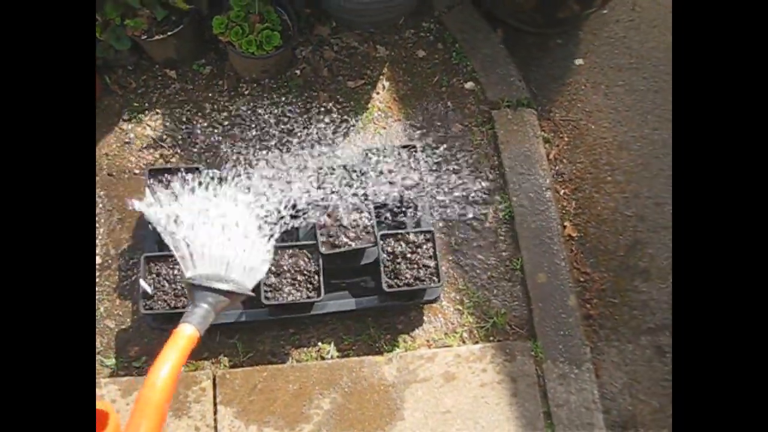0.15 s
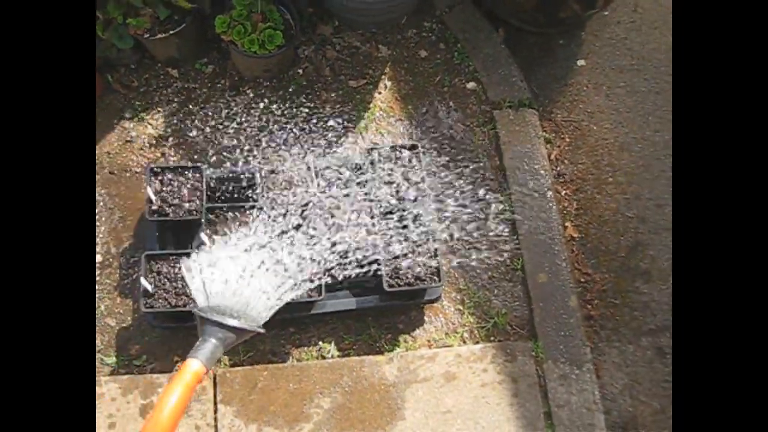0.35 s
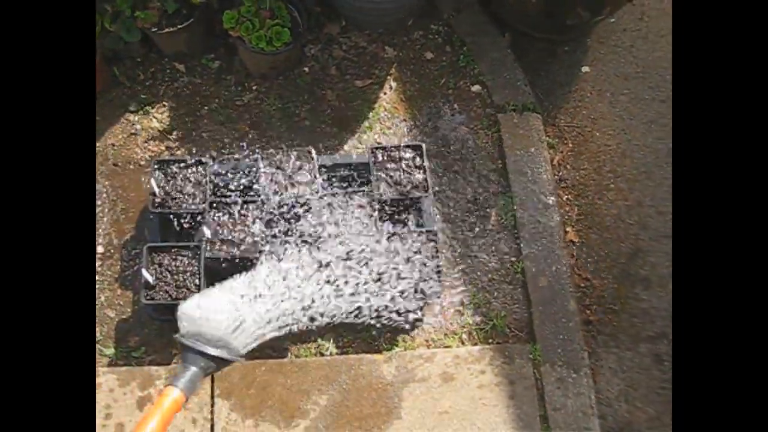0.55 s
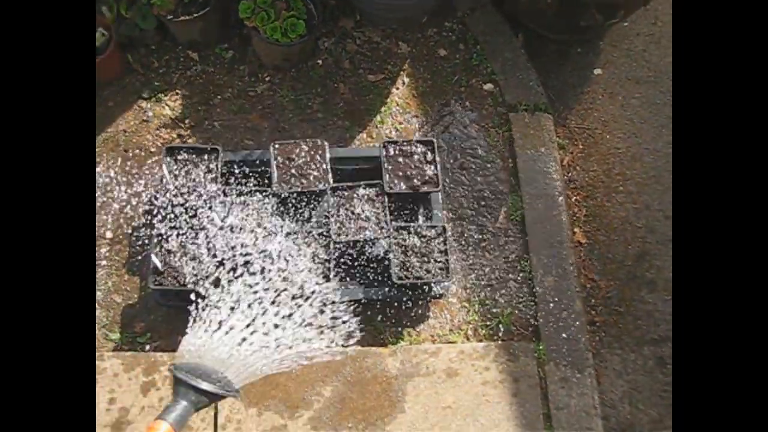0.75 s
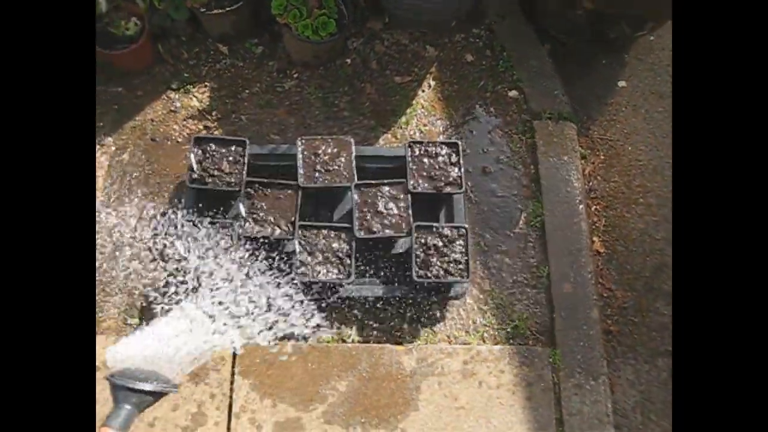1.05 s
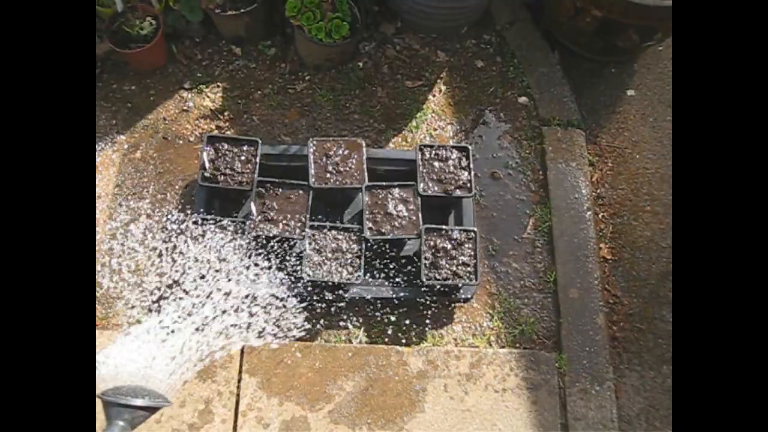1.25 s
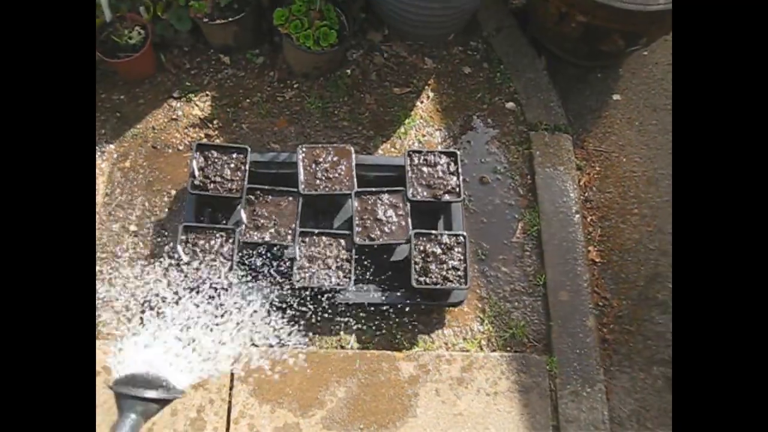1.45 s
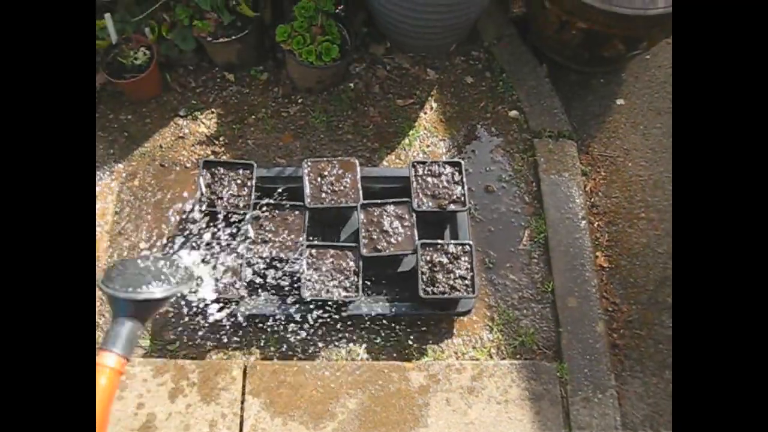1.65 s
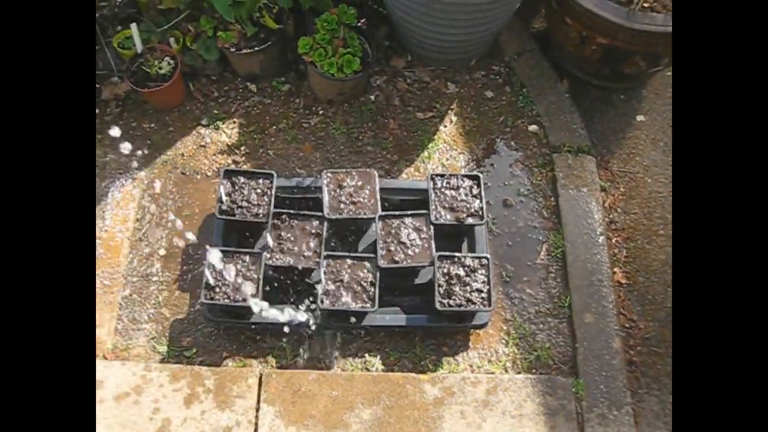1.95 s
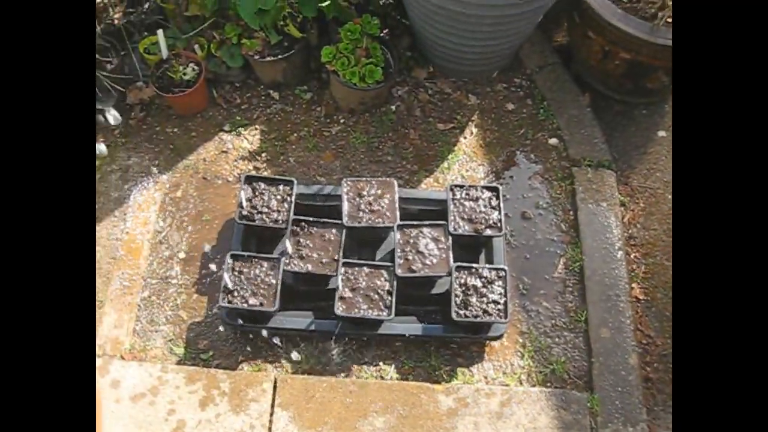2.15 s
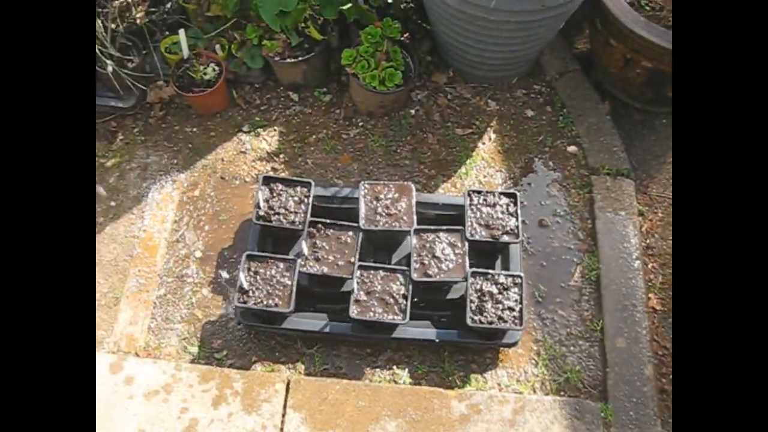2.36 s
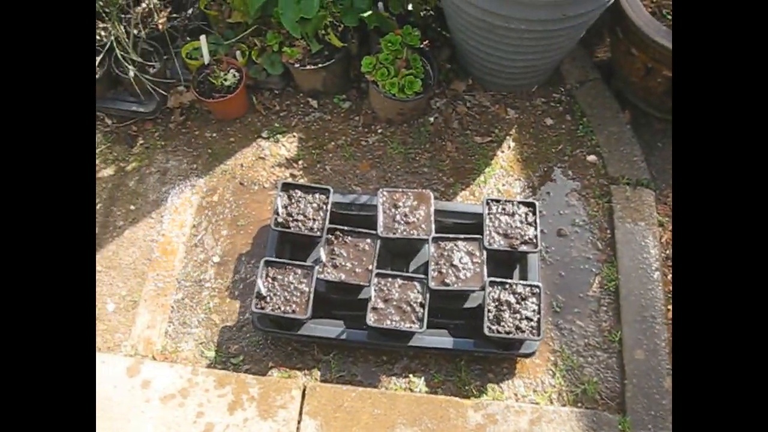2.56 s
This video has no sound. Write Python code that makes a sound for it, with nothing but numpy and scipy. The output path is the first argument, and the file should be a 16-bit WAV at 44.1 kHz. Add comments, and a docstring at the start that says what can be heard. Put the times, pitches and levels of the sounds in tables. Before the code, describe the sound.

Water from a watering can showers onto soil in plastic pots, then stops and drips.

```python
"""Watering plastic pots

A shower from a sprinkler rose falls on compost in plastic pots, then on the ground beside them, close by
outdoors. Dense random impacts merge into a noise that drums, splashes and fizzes; fat drops tick sharply.
The spray stops near 1.9 s: last drops slap down, the plastic waterer gives a hollow thump and a few
knocks as its modes are struck, and the wet ground trickles."""
import sys
import numpy as np
from scipy import signal
from scipy.fft import rfft, irfft
from scipy.io import wavfile
from scipy.ndimage import uniform_filter1d

SR = 44100
rng = np.random.default_rng(int(sys.argv[2]) if len(sys.argv) > 2 else 0)


def materialize(psi):
    """Save the field psi as 16-bit PCM at rate SR to the path in sys.argv[1].

    A 1-D psi becomes a single channel; in a 2-D psi each row is a channel.
    """
    bounded = np.clip(np.atleast_2d(psi).T, -1, 1)
    quanta = np.round(bounded * 32767).astype(np.int16)
    wavfile.write(sys.argv[1], SR, quanta)


N = 119070
TIME_S = np.arange(N) / SR
FREQ_HZ = np.maximum(np.arange(N // 2 + 1) * SR / N, 1)
DROP_LOW_HZ, TOP_HZ = 394, 15600  # lower edge of the drop sounds; upper limit of the sound


def amp(db):
    """Decibels to amplitude ratio."""
    return 10 ** (np.asarray(db, float) / 20)


def unit(x):
    """Normalisation to rms 1."""
    return x / np.sqrt(np.mean(x ** 2) + 1e-20)


def spectrum(points):
    """Spectral envelope: gain interpolated through (Hz, dB) points on a log frequency axis."""
    hz, db = np.array(sorted(map(tuple, points)), float).T
    return amp(np.interp(np.log(FREQ_HZ), np.log(hz), db))


def peak(detuning):
    """Lorentzian resonance curve, one half at a detuning of 1."""
    return 1 / (1 + detuning ** 2)


def colour(x, gain):
    """Minimum-phase filtering: folding the cepstrum makes the response causal."""
    cepstrum = irfft(np.log(gain + gain.max() * 1e-5), N)
    cepstrum[1:N // 2] *= 2
    cepstrum[N // 2 + 1:] = 0
    response = irfft(np.exp(rfft(cepstrum)), N)[:4096]
    return signal.fftconvolve(x, response)[:N]


def noise(gain):
    """Spectrally shaped Gaussian noise of rms 1."""
    return unit(irfft(rfft(rng.standard_normal(N)) * gain, N))


def fade(start, decay):
    """Exponential decay from a sudden onset."""
    age = TIME_S - start
    return (age >= 0) * np.exp(-np.maximum(age, 0) / max(decay, 1e-4))


def burst(start, decay, gain):
    """Impact transient: coloured noise dying away from about rms 1."""
    envelope = fade(start, decay)
    x = noise(gain) * envelope
    return x * np.sqrt(np.sum(envelope ** 2) / (np.sum(x ** 2) + 1e-20))


def damped_mode(start, hz, db, decay, rise_s):
    """Free vibration of one mode: a damped sine with a soft onset."""
    envelope = fade(start, decay) * (1 - fade(start, rise_s))
    return amp(db) * envelope * np.sin(2 * np.pi * hz * (TIME_S - start))


def wander(rate_hz):
    """Smoothed random fluctuation with a spread near 1."""
    hold = int(SR / rate_hz)
    steps = np.repeat(rng.standard_normal(N // hold + 1), hold)
    return 1.3 * uniform_filter1d(uniform_filter1d(steps, hold), hold)[:N]


def patter(rate, spread_db, decay):
    """Shot noise: randomly timed splashes, many small and few large, add in power."""
    size = amp(spread_db * np.minimum(rng.exponential(size=N), 6))
    impacts = size * (rng.random(N) < rate / SR)
    power = signal.lfilter([1], [1, -np.exp(-2 / (decay * SR))], impacts ** 2)
    return unit(np.sqrt(power) * rng.standard_normal(N))


def pitched_patter(edges_hz, rate, spread_db, decay, pitches=3, width_octaves=0.51):
    """Incoherent sum: independent drop streams, pitched between the edges, add to a flat spectrum."""
    centres = np.geomspace(*edges_hz, 2 * pitches + 1)[1::2]
    bands = peak(np.log2(FREQ_HZ / centres[:, None]) / width_octaves) ** 2
    bands = bands / np.sqrt(np.sum(bands ** 2, axis=0))
    return sum(colour(patter(rate, spread_db, decay), band) for band in bands)


# Spectrum of still garden air: frequency_hz, relative_db
AIR_SPECTRUM = [(20, -4), (52, 4), (100, -3.5), (320, 5), (1000, -6.5), (15000, -39)]
def garden_air():
    """Ambient noise: a faint, stationary floor, strongest in the bass."""
    return amp(-55.5) * noise(spectrum(AIR_SPECTRUM))


def yard_reflections(direct):
    """Diffuse reflection: convolution with a weak, quickly decaying noise tail."""
    response = rng.standard_normal(N) * fade(start=0.0019, decay=0.036)
    response /= np.sqrt(np.sum(response ** 2))
    return amp(-18) * signal.fftconvolve(direct, response)[:N]


# Bubbles in the trickle: start_s, pitch_hz, level_db, decay_s, width_hz
BUBBLES = [(2.023, 5900, -25.5, 0.01, 400), (2.27, 5100, -40, .07, 350), (2.514, 4200, -37.5, 0.043, 130)]
def bubbles():
    """Bubble resonance: narrow bands of decaying noise give thin, wavering rings."""
    return sum(amp(db) * burst(start, decay, peak(2 * (FREQ_HZ - hz) / width))
               for start, hz, db, decay, width in BUBBLES)


# Rings of struck plastic and puddles: start_s, pitch_hz, level_db, decay_s
PLINK_MODES = [(2.008, 990, -17, 0.0051), (2.01, 1440, -19.5, 0.0068), (2.0727, 2920, -8.5, 0.0031),
               (2.3497, 2614, -17, 0.0082), (2.358, 1150, -33, 0.02), (2.495, 2100, -29, 0.0092),
               (2.496, 331, -37.5, 0.018), (2.661, 2693, -24, 0.0055), (2.672, 2250, -26.5, 0.0075),
               (2.685, 992, -33.5, 0.018)]
def plinks():
    """Impulse excitation: some impacts leave a single mode ringing briefly."""
    return sum(damped_mode(*mode, rise_s=0.00035) for mode in PLINK_MODES)


# Brief bursts through the waterer's shell, the later ones knocks: start_s, level_db, decay_s,
# tilt_db_per_octave
SHELL_KNOCKS = [(2.327, -29.5, 0.012, 4), (2.3498, -26, 0.033, 1), (2.4922, -24.5, 0.011, 4.5),
                (2.659, -34.5, 0.036, 5)]
# Response of its plastic shell: frequency_hz, relative_db
SHELL_SPECTRUM = [(120, -33), (330, 1), (480, -12), (700, 1), (1150, 0.5), (1450, -2), (2050, 2.5),
                  (2900, -5.5), (3700, -12.5), (5300, -10), (8000, -17.5), (12000, -16.5), (15000, -34)]
def waterer_knocks():
    """Source and filter: the shell's broad resonances colour each knock and rattle."""
    shell = spectrum(SHELL_SPECTRUM)
    return sum(amp(db) * burst(start, decay, shell * amp(tilt * np.log2(FREQ_HZ)))
               for start, db, decay, tilt in SHELL_KNOCKS)


# Thumps of the emptying waterer: start_s, gain_db
BODY_THUMPS = [(2.04, -11.5), (2.121, 1)]
# Modes of its hollow body: pitch_hz, relative_db, decay_s
BODY_MODES = [(150.5, -34, 0.077), (172, -37, 0.053), (190, -39, 0.042), (263, -41, 0.026)]
def waterer_thumps():
    """Modal superposition: the low modes of the hollow body sound together, softly, then fully."""
    return sum(damped_mode(start, hz, gain_db + db, decay, rise_s=0.0048)
               for start, gain_db in BODY_THUMPS for hz, db, decay in BODY_MODES)


# Last drops, with relative band levels: start_s, decay_ms, thud_db, clack_db, snap_db, fizz_db
LAST_DROPS = [(1.8644, 3.4, -35, -53, -28, -19.5), (1.9055, 0.66, -20, -37, -16, -25),
              (1.9286, 5.8, -30.5, -26, -26.5, -27), (1.9776, 7.5, -29, -22, -22, -21),
              (2.0076, 2.7, -15, -21, -10.5, -12), (2.0174, 2, -29, -22, -14, -12.5),
              (2.0513, 3.3, -19.5, -25, -18, -14), (2.0729, 3.6, -23.5, -14.5, -13.5, -33),
              (2.0824, 1, -32, -38, -46, -11.5), (2.103, 3.9, -36, -26, -32, -16.5),
              (2.1165, 1.3, -37, -28, -7.5, -16), (2.1272, 3.9, -57, -36, -24, -15),
              (2.142, 0.84, -55, -33, -22, -9.5), (2.158, 3.8, -51, -26.5, -36, -23),
              (2.1817, 0.77, -59, -28, -19, -7.5), (2.198, 1.7, -41, -20, -20, -17),
              (2.2196, 1.4, -77, -14, -11, -10.5), (2.2613, 2.6, -46, -37, -33, -21.5),
              (2.4496, 4.7, -51, -24.5, -23, -15), (2.5769, 0.89, -46, -34, -37, -20),
              (2.5922, 0.89, -51, -51, -37, -21), (2.6855, 1.7, -35.5, -44, -11.5, -29)]
# Centres of those bands: thud_hz, clack_hz, snap_hz, fizz_hz
SLAP_BANDS_HZ = [1000, 2900, 5600, 10000]
def last_drops():
    """Impact and secondary splash: each drop slaps wet plastic or ground and scatters droplets."""
    scatter_db, scatter_s = -14, 0.006
    slaps = 0
    for start, decay_ms, *band_db in LAST_DROPS:
        density_db = np.array(band_db) - 10 * np.log10(SLAP_BANDS_HZ)  # band level to level per hertz
        skirts = [(400, density_db[0] - 10), (650, density_db[0] - 5), (15500, density_db[-1] - 10)]
        gain = spectrum([*skirts, *zip(SLAP_BANDS_HZ, density_db)])
        strength = amp(-2.5) * np.sqrt(np.sum(amp(band_db) ** 2))
        impact = burst(start, decay_ms / 1000, gain)
        scatter = amp(scatter_db) * burst(start, scatter_s, gain)
        slaps += strength * (impact + scatter)
    return signal.sosfilt(signal.butter(4, DROP_LOW_HZ, "high", fs=SR, output="sos"), slaps)


# Fat drops in the shower: start_s, relative_db, centre_hz, decay_ms
FAT_DROPS = [(0.1868, -13, 9800, 0.84), (0.2333, -15, 10000, 1.2), (0.2883, -15, 8400, 1.6),
             (0.3048, -8.5, 8200, 0.97), (0.3967, -12.5, 8900, 2.1), (0.4112, -6, 10800, 0.35),
             (0.416, -19, 5200, 3.3), (0.447, -11, 9700, 1.2), (0.5246, -10, 9600, 0.55),
             (0.6093, -13.5, 10200, 1.1), (0.66, -7, 10100, 0.49), (0.674, -15, 9200, 5.5),
             (0.756, -16, 7100, 1.9), (0.812, -14.5, 7860, 1), (0.8328, -13, 10100, 0.76),
             (0.8395, -7, 8400, 1.7), (0.8571, -12, 10000, 0.57), (0.9784, -16.5, 9400, 1.2),
             (1.0957, -11.5, 10100, 1.6), (1.174, -16.5, 7400, 0.98), (1.2126, -13, 10300, 0.62),
             (1.3029, -10, 9400, 0.52), (1.4806, -17, 5700, 3.7), (1.5091, -13.5, 8500, 1.1),
             (1.6479, -11, 9700, 0.5), (1.6721, -11, 9450, 1.3), (1.8085, -12.5, 8300, 0.59)]
def fat_drops(gain_db=-2, width_octaves=0.24):
    """Brief impacts radiate high frequencies: each fat drop gives a bright tick."""
    return sum(amp(db + gain_db) * burst(start, ms / 1000, peak(np.log2(FREQ_HZ / hz) / width_octaves))
               for start, db, hz, ms in FAT_DROPS)


# Pot and tray walls under the spray: middle_s, half_length_s, pitch_hz, width_hz, level_db
WALL_RESONANCES = [(0.169, 0.038, 1300, 120, -30), (.3, 0.25, 2610, 200, -42.5),
                   (0.494, 0.03, 1300, 130, -31.5), (0.816, 0.14, 680, 282, -32.5),
                   (1.085, .08, 2770, 344, -37.5), (1.135, 0.013, 800, 150, -29),
                   (1.602, 0.017, 2770, 300, -37)]
def pot_walls():
    """Forced vibration: drops drive one resonance of the plastic after another as the spray passes."""
    rate, spread_db, decay, _ = DROP_GRAIN[1]  # the shower's splash band
    bass_cut = 1 / (1 + (DROP_LOW_HZ / FREQ_HZ) ** 6)
    ringing = 0
    for middle, half_length, hz, width, db in WALL_RESONANCES:
        resonance = peak(2 * (FREQ_HZ - hz) / width) ** .75 * bass_cut
        dwell = np.exp(-((TIME_S - middle) / half_length) ** 2 / 2)
        ringing += amp(db) * dwell * unit(colour(patter(rate, spread_db, decay), resonance))
    return ringing


# Spectra of water on the pots, on the ground and trickling afterwards: frequency_hz, relative_db
POT_SPECTRUM = [(100, -40), (205, -28), (340, -13.5), (467, -18), (560, -7), (936, -4.5), (1060, -10),
                (1200, -4.5), (1320, -3.5), (1480, -10), (2250, -14), (2650, -12.5), (3200, -15),
                (4800, -16.5), (7000, -17), (8770, -13), (12000, -11.5), (15500, -23.5)]
GROUND_SPECTRUM = [(59, -44), (177, -38.5), (270, -9), (467, -13), (589, -4.5), (808, -0.5), (1130, -7),
                   (1310, -3), (1920, -8), (2420, -8.5), (2690, -3.5), (3250, -9), (5870, -10.5),
                   (6810, -15.5), (8770, -11.5), (11500, -13), (15500, -23.5)]
TRICKLE_SPECTRUM = [(100, -6), (220, -3), (330, 2), (480, -8.5), (750, 0), (1500, -1), (2700, 1),
                    (3600, -4.5), (5400, 1.5), (7000, -13), (10500, -12), (13000, -22), (15500, -26)]
def strike_surfaces(drops, band):
    """The struck surface sets the timbre: pots, ground, paving and trickle crossfade in turn."""
    leaves_pots_s, reaches_paving_s, trickles_s, crossfade_s = 0.587, 1.278, 2.104, 0.2
    off_pots, paved, stopped = (np.clip((TIME_S - middle) / crossfade_s + .5, 0, 1)
                                for middle in (leaves_pots_s, reaches_paving_s, trickles_s))
    paving = [(hz, db - 2 / (1 + (hz / 770) ** 4)) for hz, db in GROUND_SPECTRUM]  # thinner in the bass
    surfaces = [(1 - off_pots, POT_SPECTRUM), (off_pots * (1 - paved), GROUND_SPECTRUM),
                (paved * (1 - stopped), paving), (stopped, TRICKLE_SPECTRUM)]
    return sum(np.sqrt(share) * unit(colour(drops, spectrum(points) * band)) for share, points in surfaces)


# Course of the shower and trickle: time_s, drum_db, splash_db, fizz_db
FLOW_LEVELS = [(0, -29.5, -30.5, -32), (.07, -32, -35, -36), (.17, -31, -32, -29.5),
               (.3, -32, -33.5, -35.5), (0.431, -28.5, -30.5, -34.5), (.56, -36.5, -39, -37),
               (.66, -33.5, -36.5, -30.5), (.75, -31, -32.5, -35.5), (.88, -31, -32.5, -30),
               (.98, -32, -33, -34.5), (1.1, -28, -31, -34.5), (1.26, -37, -36.5, -37.5),
               (1.45, -29.5, -31, -31), (1.619, -32.5, -30.5, -33), (1.76, -33.5, -33.5, -35),
               (1.85, -34.5, -35, -35.5), (1.92, -40.5, -40, -52), (1.955, -40.5, -42, -45.5),
               (2.02, -36.5, -37.5, -44.5), (2.13, -53, -46, -41.5), (2.25, -43, -40.5, -35.5),
               (2.3, -50, -42, -46), (2.44, -51.5, -50, -43.5), (2.57, -48.5, -45, -49.5),
               (2.63, -53.5, -52.5, -50), (2.7, -62, -40, -32)]
# Drop statistics for drum, splash and fizz: drops_per_s_per_pitch, size_spread_db, decay_s, flutter_db
DROP_GRAIN = [(2996, 1.68, 0.00029, 0.42), (2576, 2.2, 0.001, 1), (1214, 3.5, 0.00077, 3)]
def shower():
    """Superposition of random impacts: dense drops drum, splash and fizz in three fluttering bands."""
    drum_top_hz, splash_top_hz = 1822, 6900
    edges_hz = [DROP_LOW_HZ, drum_top_hz, splash_top_hz, TOP_HZ]
    below_splash, below_fizz = (1 / (1 + (FREQ_HZ / hz) ** 8) for hz in (drum_top_hz, splash_top_hz))
    bands = np.sqrt([below_splash, below_fizz * (1 - below_splash), 1 - below_fizz])
    times, *band_db = np.array(FLOW_LEVELS).T
    water = 0
    for k, (rate, spread_db, decay, flutter_db) in enumerate(DROP_GRAIN):
        drops = pitched_patter(edges_hz[k:k + 2], rate, spread_db, decay)
        level_db = np.interp(TIME_S, times, band_db[k]) + flutter_db * wander(rate_hz=90)
        water += amp(level_db) * strike_surfaces(drops, bands[k])
    return water


def scene():
    """Linear superposition: direct sound, its reflections and still air add in one channel."""
    water = shower() + pot_walls() + fat_drops() + last_drops() + plinks()
    direct = water + waterer_knocks() + waterer_thumps() + bubbles()
    return (direct + yard_reflections(direct) + garden_air())[None]


def record(dry):
    """Band limiting: a steep elliptic low-pass removes the highest treble."""
    return signal.sosfilt(signal.ellip(10, .2, 80, TOP_HZ, fs=SR, output="sos"), dry)


dry = scene()
out = record(dry)
materialize(out)
```